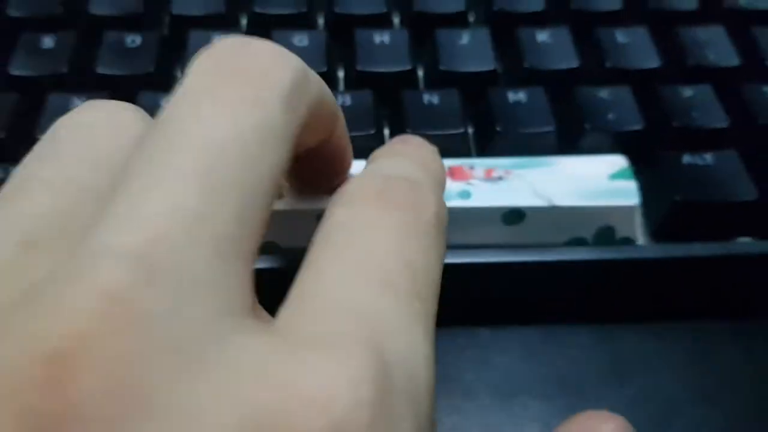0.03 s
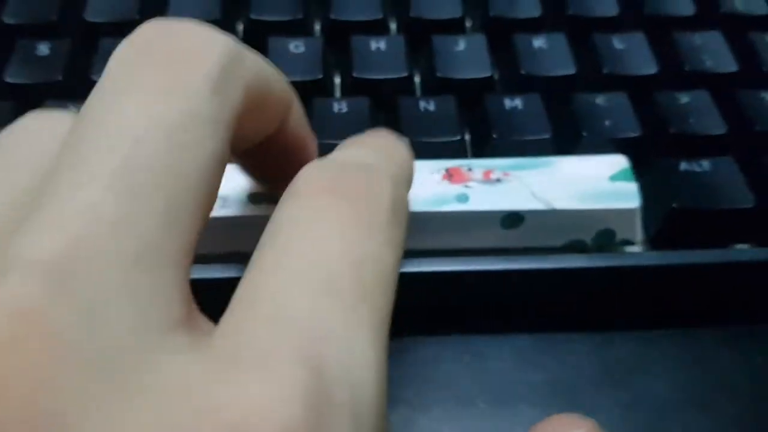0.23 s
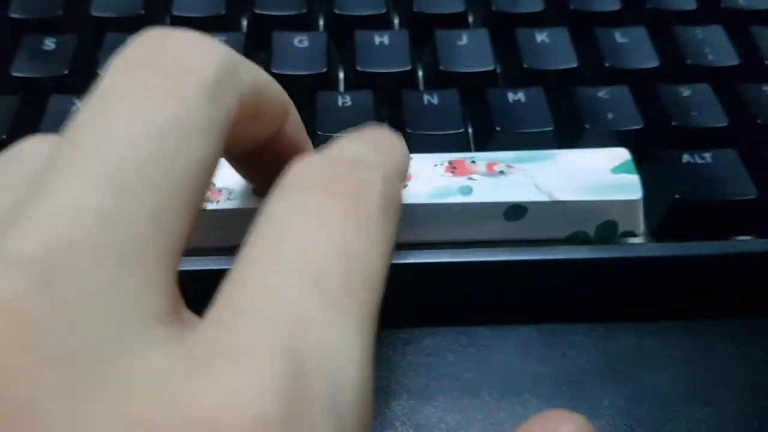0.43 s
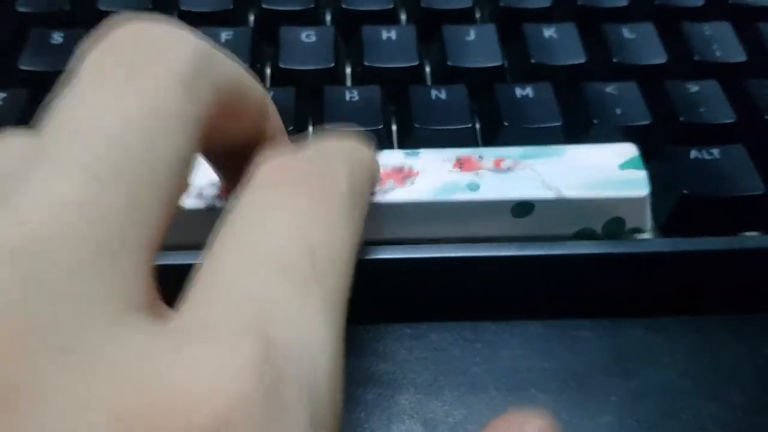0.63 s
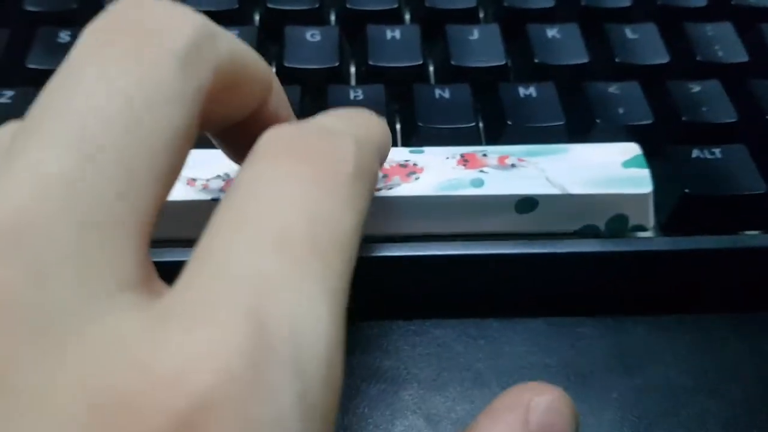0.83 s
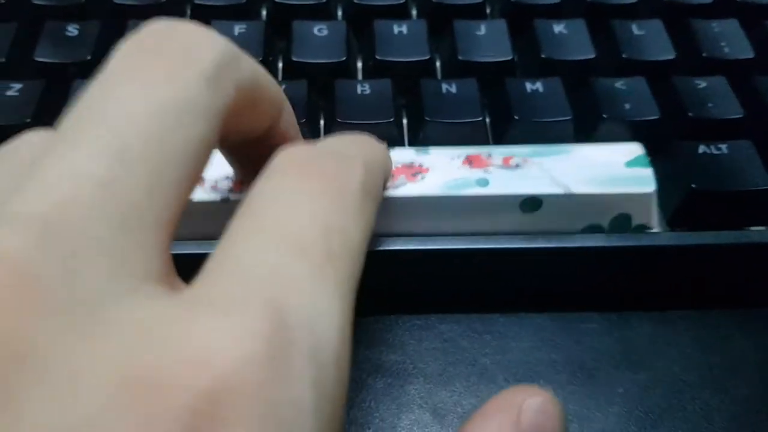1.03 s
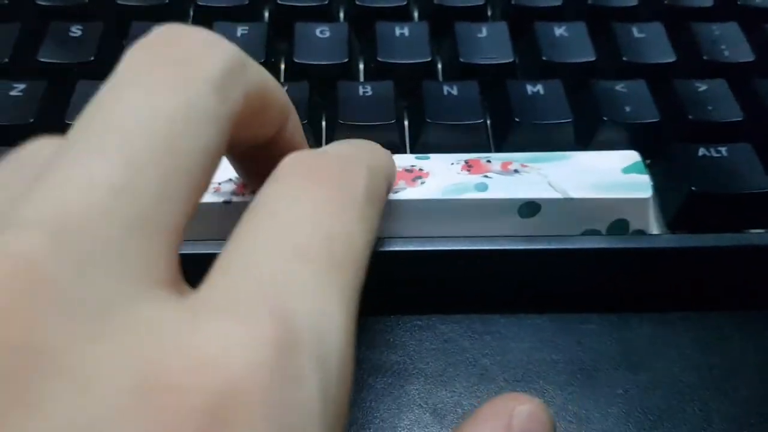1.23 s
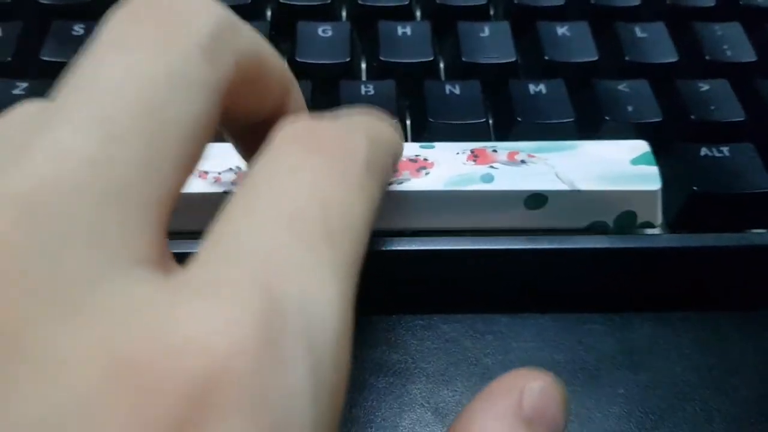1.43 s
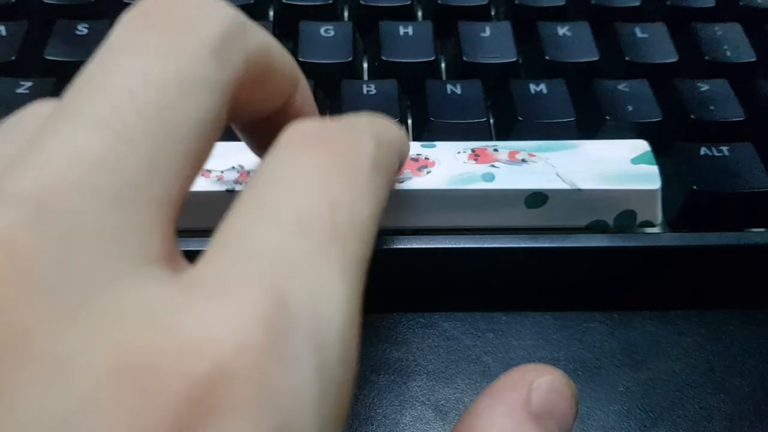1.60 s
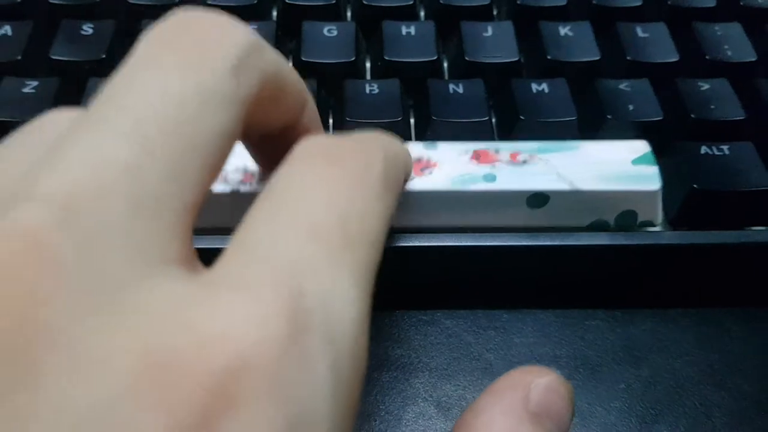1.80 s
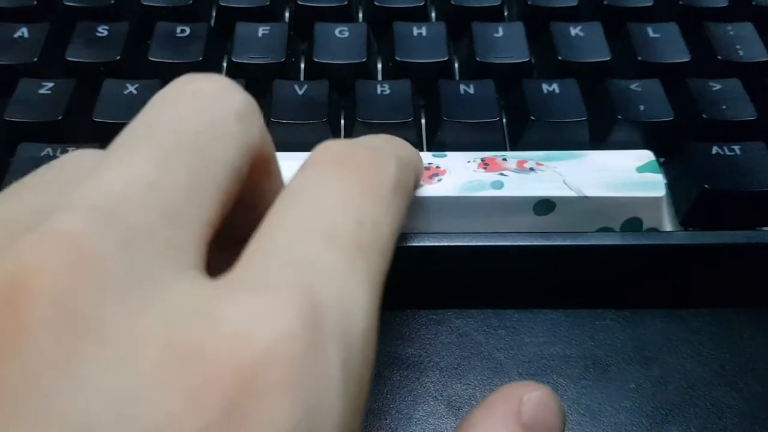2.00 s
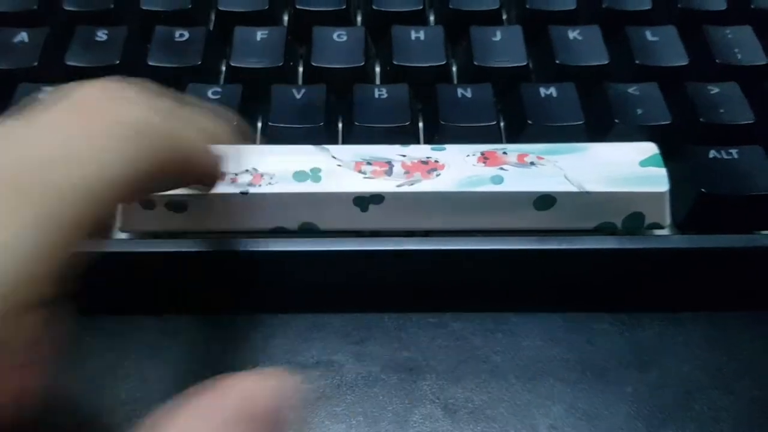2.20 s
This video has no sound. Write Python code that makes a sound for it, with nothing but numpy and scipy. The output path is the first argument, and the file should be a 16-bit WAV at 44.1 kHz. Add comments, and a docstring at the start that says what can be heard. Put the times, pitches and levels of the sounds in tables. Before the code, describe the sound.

A mechanical keyboard spacebar is struck seven times, speeding up slightly. Each press brings a fingernail tick, a deep plastic clack and a lighter knock as the bar springs back, heard close in a small, quiet room.

```python
"""A faint plastic knock, then seven deep clacks: a finger striking a keyboard spacebar, close up.
In each stroke the nail ticks on the keycap, the bar bottoms out and shakes the case and desk,
loose parts rattle as the finger eases off, and the spring returns the bar with a lighter knock.
A small, quiet room echoes the strokes over a bed of low rumble, hum and hiss."""
import sys
import numpy as np
from scipy import signal
from scipy.fft import rfft, irfft
from scipy.io import wavfile

SR = 44100
rng = np.random.default_rng(int(sys.argv[2]) if len(sys.argv) > 2 else 0)


def wav_record(signal):
    """Record a signal, one row per channel, as 16-bit PCM in the file named by sys.argv[1]."""
    frames = np.transpose(np.atleast_2d(signal))
    bounded = np.clip(frames, -1, 1)
    # unit amplitude maps onto the largest positive 16-bit level
    quanta = np.round(bounded * 32767).astype(np.int16)
    wavfile.write(sys.argv[1], SR, quanta)


N = 103635

# bar bottoms out: t/s, clack/dB, thump/dB, treble/dB
PRESS_CUES = [(0.2393, -2.5, -0.5, 1), (0.6, 2, 1.5, -4), (0.9124, -3.5, 0.5, 13), (1.1675, -4, -1, -2.5),
              (1.422, -2, -1, 2), (1.6562, -1, -0.5, 0.5), (1.8924, -1, 3, -1.5)]
# bar returns to its top stop: t/s, knock/dB, thump/dB, treble/dB, spring/dB, hollow ring/dB
RELEASE_CUES = [(0.016, -22, -14.5, -33, -67, -20), (0.3508, -8, -11.5, -1, -70, -14.5),
                (0.7178, -6, -11, -26, -56, -9), (1.002, -1, -3.5, 9, -47, -2.5),
                (1.272, -3, -4.5, 2.5, -66.5, -4), (1.5124, 0.5, -5, -11, -67.5, -2),
                (1.7534, -5, -8.5, -4.5, -71, -11.5), (1.9999, 0.5, -5, 17, -36, -7)]
# nail lands: t/s, tick/dB, treble/dB, thump/dB, spring/dB
TAP_CUES = [(0.2097, -7, 3.5, -15, -50.5), (0.577, -5.5, -25, -20, -74.5), (0.5805, -1, 13, -12, -56),
            (0.8872, -3.5, 10.5, -13, -50), (1.1395, -3.5, 5.5, -13, -55), (1.3963, -0.5, 10.5, -11.5, -62),
            (1.4015, -8, 12, -18, -67.5), (1.6265, -3.5, -25.5, -30, -55), (1.6351, -5, -1, -18, -71),
            (1.859, -3, -34, -18.5, -53)]
# stem, stabiliser wire and fingertip rub: t/s, length/s, level/dB, treble/dB
RATTLE_CUES = [(0.018, 0.015, -16, -21), (0.331, 0.0043, -8, -9), (0.694, 0.013, -7, -17),
               (.981, 0.0069, 0, -20), (1.247, 0.0089, -5.5, 1), (1.489, 0.01, -5.5, 12),
               (1.733, 0.018, -12.5, 9), (1.982, 0.0022, -2, -17.5), (2.045, 0.034, -12, 9)]

# pitched plastic modes: f/Hz, level/dB, t60/s, pan/dB (positive is left)
BAR_MODES = [(608.4, -48, 0.088, -14.5), (1026, -47, 0.031, -5), (1204, -36.5, 0.058, 12),
             (1288, -36.5, 0.084, -2), (1428, -25.5, .047, 8), (1545, -34, .04, -7),
             (2010, -35.5, 0.035, 4.5), (2469, -37.5, 0.047, -12), (2570, -39.5, 0.045, -16.5),
             (2718, -46.5, 0.05, -15), (3494, -37, 0.014, 10.5), (3753, -34, 0.015, -1),
             (6670, -41.5, 0.014, 8)]  # bar and case
STOP_MODES = [(494, -41.5, 0.065, 4), (1025, -40, 0.024, 11), (1424, -43.5, 0.067, 7),
              (1607, -39.5, 0.047, -11), (3190, -51.5, 0.025, -4)]  # switch housing and case, knocked from below
CAP_MODES = [(2786, -47, .025, -3), (4930, -49, .025, -6.5), (6600, -50.5, 0.027, 8.5)]  # keycap top
# low body modes: f/Hz, level/dB, t60/s, attack/s
DESK_MODES = [(57.6, -25.5, 0.14, 0.0035), (85.1, -41.5, 0.45, 0.002), (128.85, -37.5, 0.4, 0.013),
              (158.6, -45.5, 0.84, 0.033), (182, -41, 0.15, 0.00067), (209.4, -35.5, 0.14, 0.003),
              (247.4, -45.5, 0.25, 0.00044), (305.8, -34, 0.064, 0.00083), (335.3, -32, 0.056, 0.00055),
              (346.4, -50.5, 0.35, 0.002), (426.5, -33, 0.063, 0.00071)]
ROCK_MODES = [(135.6, -31.5, 0.24, 0.0013), (189, -29.5, 0.05, 0.0044)]  # case rocking on its feet
# return spring: f/Hz, level/dB, t60/s
SPRING_MODES = [(2470, 1, 0.04), (2460, -13, 0.29), (2530, -5, 0.05), (2660, -13, 0.12)]
# dense resonances: f/Hz, level/dB, t60/s, pan/dB
CLACK_BANDS = [(400, -15, 0.005, 18), (525, -24.5, 0.084, 2.5), (831, -27, 0.08, 7),
               (1050, -15, 0.017, 10.5), (1450, -21, 0.035, 3), (1850, -16, 0.025, -3.5),
               (2210, -16, 0.025, -4.5), (2850, -25, 0.14, -1), (3300, -30.5, 0.041, 6.5),
               (3940, -23.5, 0.03, -1.5), (3940, -22.5, 0.016, 2.5), (4900, -25, 0.039, 0),
               (7100, -34.5, 0.035, 5), (7350, -36.5, 0.035, 1), (9500, -36, .025, 5),
               (11500, -32.5, 0.023, 2.5), (13870, -28.5, 0.036, 3.5), (16000, -41.5, .02, -14)]  # hard plastic hit
KNOCK_BANDS = [(400, -35, 0.036, 1), (530, -27.5, 0.071, 0), (782, -32.5, 0.065, -0.18),
               (1180, -27, 0.07, 2.2), (1600, -34.5, 0.12, 0.38), (2250, -32, 0.073, -2),
               (3370, -33, 0.027, -0.63), (6000, -43.5, 0.018, 0.62), (8850, -61, 0.018, 1),
               (12300, -51, 0.014, 1)]  # bar on its top stop
TICK_BANDS = [(500, -39.5, 0.074, 3), (1420, -39, 0.083, 2), (2640, -45, 0.15, -6),
              (4930, -37.5, 0.057, -1.5), (7100, -39, 0.02, 10.5), (7960, -50, 0.031, -2.5),
              (10880, -33.5, 0.013, 12.5), (12360, -31, 0.036, 2.5), (14470, -38, 0.01, -2)]  # nail on the keycap
SNAP_BANDS = [(5000, -43.5, .005, 5.5), (9720, -35.5, 0.0034, 8.5), (10820, -18, 0.0041, 12),
              (12200, -21, 0.0051, 6), (13500, -24, 0.004, 5.5), (14500, -39, 0.003, 0.5),
              (15000, -21.5, 0.006, 3), (15800, -38, 0.003, 4)]  # sharp edge of the nail
RUB_BANDS = [(810, -46.5, 0.065, 0), (2680, -31.5, 0.025, -0.6), (3300, -45, 0.069, 0),
             (6000, -42.5, 0.0083, 0), (8720, -62, 0.027, 0.26), (13000, -42, .015, 0.82),
             (16000, -59, .015, 0.94)]  # loose parts
ROOM_BANDS = [(144.4, -7, 1, -1.5), (290, -0.5, 0.23, -4.5), (556, -5, 0.34, 1.5), (1430, -5.5, 0.2, -4),
              (2620, -7.5, 0.24, 0), (4930, -9.5, 0.29, -4.5), (8700, -9, 0.27, 3.5),
              (14000, -13.5, 0.46, -5)]  # room tail
# stereo image of close and diffuse sound: f/Hz, left-right correlation
CLOSE_IMAGE = [(300, 0.87), (1400, 0.58), (3000, 0), (10000, 0)]
ROOM_IMAGE = [(100, 0.97), (300, 0.92), (800, 0.11), (2500, 0.048)]
# rumble and hiss spectrum: f/Hz, relative level/dB
BED_SPECTRUM = [(22, 10), (36, -21), (52, 7.5), (80, -9), (103, 2), (132, -20), (165, -9), (235, -15),
                (340, -20.5), (480, -32), (700, -37), (1500, -42.5), (4000, -46.5), (8300, -57.5),
                (10000, -47), (12000, -38.5), (15500, -37), (16300, -52)]
# hum partials: f/Hz, level/dB
HUM_TONES = [(80.7, -54), (132.5, -55.5)]

DESK_DELAY_S, DESK_PAN_DB = 0.0028, 3.5


def presses(far_lag_s=0.008, far_spread_s=0.005, far_db=-10):
    """The bar hits the plate: a clack, a ring as each end lands, and a thump for weight."""
    out, body = np.zeros((2, N)), noise(8192)
    for s, db, thump_db, treble_db in PRESS_CUES:
        hit = brighten(vary(body, above_hz=3000), treble_db)
        add(out, s, amp(db) * ring(CLACK_BANDS, hit, rise_s=0.00096, hold_s=0.0019))
        add(out, s, amp(db) * modes(BAR_MODES))
        far_end_s = s + far_lag_s + far_spread_s * rng.uniform(-0.993, 1)
        add(out, far_end_s, amp(db + far_db) * modes(BAR_MODES, detune=0.0183))
        add(out, s, amp(thump_db) * desk(soft_hz=900))
    return out


def releases(bar_db=-24, clack_db=-19):
    """The bar springs up to its stop: hollow when the finger cushions it, clacking when it flies free."""
    out, body = np.zeros((2, N)), noise(8192)
    for s, db, thump_db, treble_db, spring_db, hollow_db in RELEASE_CUES:
        hit = brighten(vary(body, above_hz=2900), treble_db)
        add(out, s, amp(db) * ring(KNOCK_BANDS, hit, rise_s=0.0032, hold_s=0.0018))
        clack = ring(CLACK_BANDS, noise(8192), rise_s=0.0009, hold_s=0.003)
        add(out, s, amp(db + clack_db + treble_db / 2) * clack)
        add(out, s, amp(db + bar_db) * modes(BAR_MODES))
        add(out, s, amp(hollow_db) * modes(STOP_MODES, rise_s=0.0014))
        add(out, s - DESK_DELAY_S, -amp(thump_db) * desk(soft_hz=290))  # tugs the desk the other way
        rocking = sum(mode(*row) for row in ROCK_MODES)
        add(out, s, amp(thump_db) * pan(DESK_PAN_DB) * rocking)
        add(out, s, spring(spring_db))
    return out


def nail_taps(snap_db=-2):
    """The nail snaps against the keycap just before the bar goes down."""
    out = np.zeros((2, N))
    for s, db, treble_db, thump_db, spring_db in TAP_CUES:
        hit = brighten(noise(4096), treble_db)
        add(out, s, amp(db) * ring(TICK_BANDS, hit, rise_s=0.0015, hold_s=0.00058))
        snap = ring(SNAP_BANDS, hit, rise_s=0.0005, hold_s=0.0001)
        add(out, s, amp(db + snap_db + treble_db / 2) * snap)
        add(out, s, amp(db) * modes(CAP_MODES))
        add(out, s, amp(thump_db) * desk(soft_hz=345))
        add(out, s, spring(spring_db))
    return out


def desk(soft_hz):
    """The keyboard pushes the desk into a low thump; a soft push spares the higher modes."""
    thump = 0
    for k, (hz, db, t60, rise_s) in enumerate(DESK_MODES):
        polarity = (-1) ** (k // 3)  # neighbouring groups swing in opposite directions
        thump += polarity * mode(hz, db, t60, rise_s) / np.hypot(1, (hz / soft_hz) ** 2)
    return pan(DESK_PAN_DB) * np.pad(thump, (round(DESK_DELAY_S * SR), 0))


def rattles():
    """Loose parts scrape softly while the bar moves."""
    out = np.zeros((2, N))
    for s, length, db, treble_db in RATTLE_CUES:
        friction = brighten(noise(8192), treble_db)
        add(out, s, amp(db) * ring(RUB_BANDS, friction, rise_s=length / 2, hold_s=length))
    return out


def spring(db):
    """The return spring pings, right of centre."""
    return pan(-8) * sum(mode(hz, db + level, t60, rise_s=0.0011) for hz, level, t60 in SPRING_MODES)


def room(keys, crossfade_hz=0.7):
    """A small room throws every stroke back; two diffuse tails slowly crossfade to keep it smooth."""
    # trim each band so a longer tail carries no extra energy
    bands = [(hz, db + 10 * np.log10(2 * np.log(1000) / (t60 * SR)), t60, side)
             for hz, db, t60, side in ROOM_BANDS]
    turn, out = 2 * np.pi * crossfade_hz * np.arange(N) / SR, 0
    for crossfade in (np.cos(turn), np.sin(turn)):
        tail = ring(bands, noise(49152, ROOM_IMAGE), rise_s=0.0081, hold_s=0.0032)
        out += signal.fftconvolve(keys * crossfade, tail, axes=1)[:, :N]
    return out


def background(bed_db=-46.5, waver=0.37):
    """Low rumble with a wavering hum, and thin microphone hiss."""
    hz, t = np.fft.rfftfreq(2 * N, 1 / SR), np.arange(N) / SR
    bed = irfft(noise(2 * N, ROOM_IMAGE) * amp(curve(BED_SPECTRUM, hz)))[:, :N]
    hum = 0
    for f, db in HUM_TONES:
        swell, wobble = waver * signal.resample(rng.standard_normal((2, 16)), N, axis=1)
        hum += amp(db) * np.sqrt(2) * (1 + swell) * np.sin(2 * np.pi * f * t + 2 * wobble)
    return pan(2) * (amp(bed_db) * bed / bed.std() + hum)


def ring(bands, excitation, rise_s, hold_s, evenness=0.7):
    """Many close resonances rise and hold together, then each band dies at its own speed."""
    size = 2 * (excitation.shape[1] - 1)
    t, hz = np.arange(size) / SR, np.fft.rfftfreq(size, 1 / SR)
    centres, db, t60, side = np.transpose(bands)
    colour = treble_share(hz, centres[0] / 2) * amp(curve(np.c_[centres, db], hz))
    attack = np.minimum(t / rise_s, 1)
    burst, smooth = 0, 0
    for k, share in enumerate(np.eye(len(bands))):
        band = pan(side[k]) * colour * curve(np.c_[centres, share], hz)
        envelope = attack * decay(np.maximum(t - hold_s, 0), t60[k])
        burst += irfft(excitation * band) * envelope
        smooth += band * np.linalg.norm(envelope)
    spectrum = rfft(burst)
    levelling = (smooth / (abs(spectrum) + 1e-12)) ** evenness  # tames chance peaks and dips
    fade = np.clip(2 - 4 * t / t[-1], 0, 1)
    return irfft(spectrum * levelling) * fade


def modes(table, detune=0.0032, spread_db=2, rise_s=0.00039):
    """Plastic parts ring, with pitch and level a little different at each stroke."""
    out = 0
    for k, (hz, db, t60, side) in enumerate(table):
        bend, accent_db = rng.standard_normal(2) * (detune, spread_db)
        out += (-1) ** k * pan(side) * mode(hz * (1 + bend), db + accent_db, t60, rise_s)
    return out


def mode(hz, db, t60, rise_s):
    """One dying vibration."""
    t = np.arange(SR // 2) / SR
    attack = 1 - np.exp(-t / rise_s)
    return amp(db) * attack * decay(t, t60) * np.sin(2 * np.pi * hz * t)


def noise(size, image=CLOSE_IMAGE):
    """A white noise spectrum whose stereo width follows the image table."""
    mid, side = np.exp(2j * np.pi * rng.random((2, size // 2 + 1)))
    correlation = curve(image, np.fft.rfftfreq(size, 1 / SR))
    width = np.arccos(correlation) / 2
    mid, side = mid * np.cos(width), side * np.sin(width)
    return np.array([mid + side, mid - side]) * np.sqrt(size)


def brighten(spectrum, treble_db, shelf_hz=4900):
    """Treble shelf: a harder contact is brighter, a softer one duller."""
    hz = np.linspace(0, SR / 2, spectrum.shape[1])
    return spectrum * amp(treble_db * treble_share(hz, shelf_hz))


def vary(body, above_hz):
    """Strokes share their low end and get fresh noise on top."""
    hz = np.linspace(0, SR / 2, body.shape[1])
    fresh = treble_share(hz, above_hz)
    return np.sqrt(1 - fresh) * body + np.sqrt(fresh) * noise(2 * (len(hz) - 1))


def treble_share(hz, corner_hz):
    """Rises from 0 in the bass to 1 in the treble."""
    return hz ** 2 / (hz ** 2 + corner_hz ** 2)


def decay(t, t60):
    """Falls 60 dB in t60 seconds."""
    return np.exp(-np.log(1000) * t / t60)


def amp(db):
    """Decibels to gain."""
    return 10 ** (np.asarray(db) / 20)


def pan(db):
    """Stereo gains with left db louder than right."""
    return amp(np.array([[db], [-db]]) / 2)


def curve(points, hz):
    """Breakpoints joined on a log-frequency axis."""
    f, value = np.transpose(points)
    return np.interp(np.log(hz + 1), np.log(f), value)


def add(mix, s, sound):
    """Mixes a sound in at s seconds."""
    part = mix[:, max(round(s * SR), 0):][:, :sound.shape[1]]
    part += sound[:, :part.shape[1]]


def scene():
    """The keyboard up front, its room and the background bed."""
    keys = presses() + releases() + nail_taps() + rattles()
    return keys + room(keys) + background()


def record(dry, low_cut_hz=52.4, high_cut_hz=16300):
    """A low cut thins the rumble and a steep high cut trims the air."""
    low_cut = signal.butter(4, low_cut_hz, "highpass", fs=SR, output="sos")
    high_cut = signal.firwin(255, high_cut_hz, window=("kaiser", 9), fs=SR)
    return signal.oaconvolve(signal.sosfilt(low_cut, dry), high_cut[None], "same")


dry = scene()
out = record(dry)
wav_record(out)
```